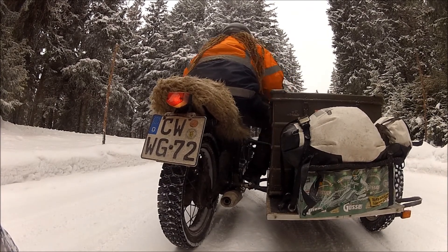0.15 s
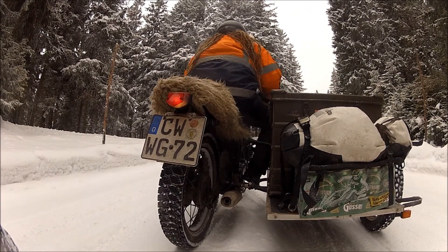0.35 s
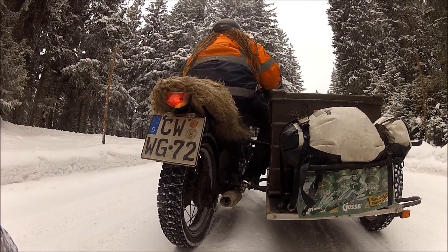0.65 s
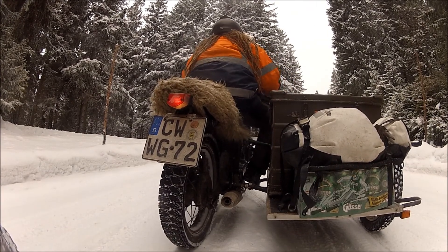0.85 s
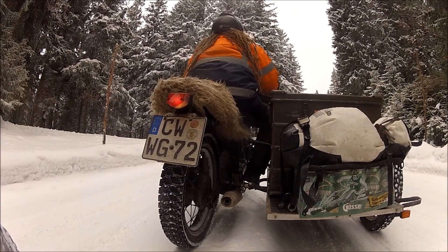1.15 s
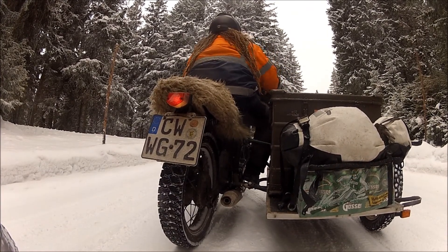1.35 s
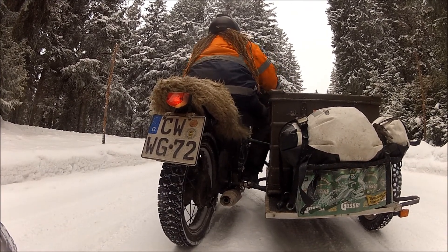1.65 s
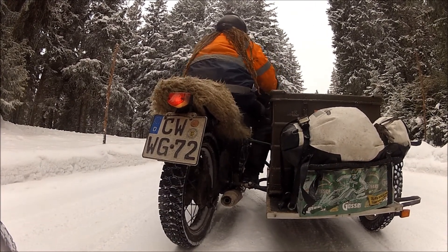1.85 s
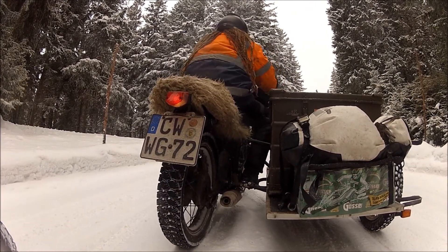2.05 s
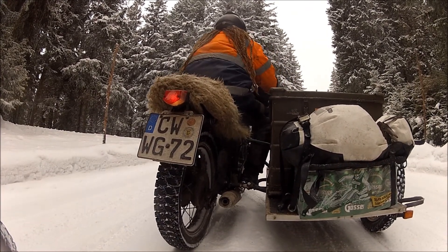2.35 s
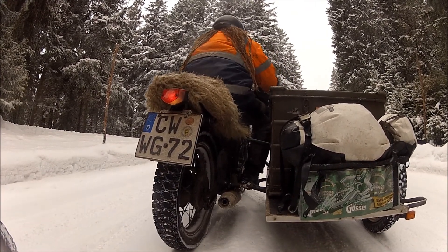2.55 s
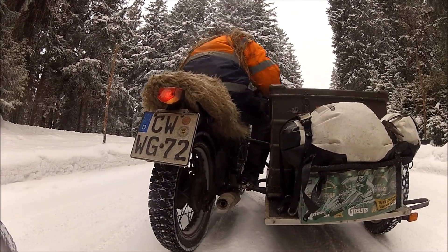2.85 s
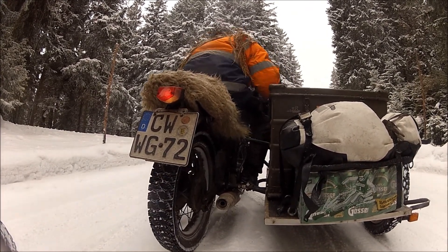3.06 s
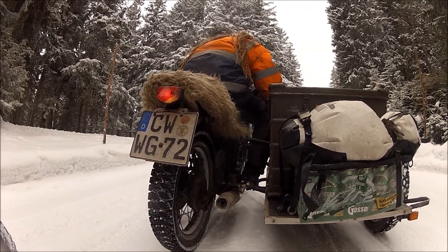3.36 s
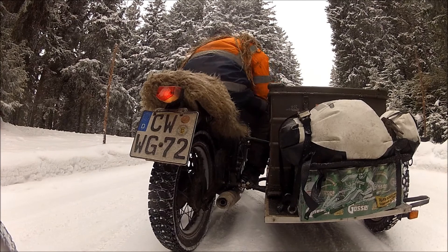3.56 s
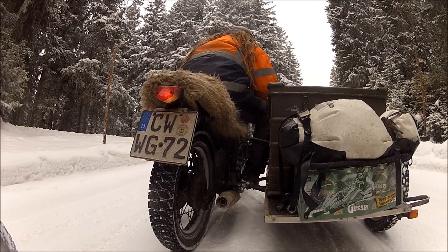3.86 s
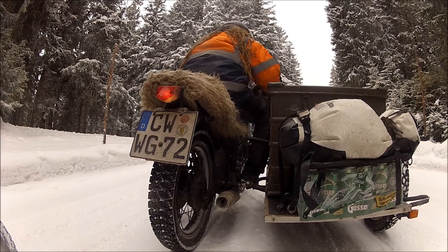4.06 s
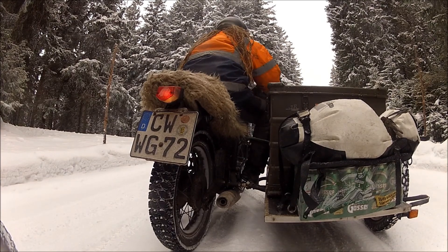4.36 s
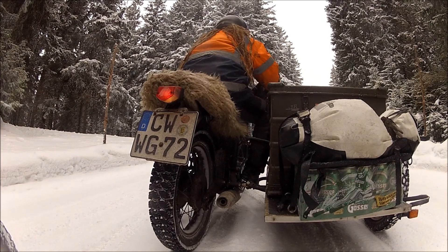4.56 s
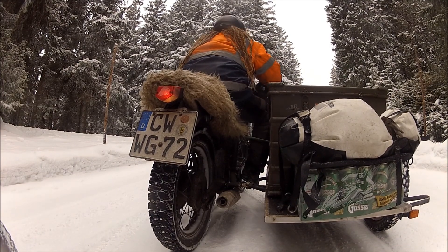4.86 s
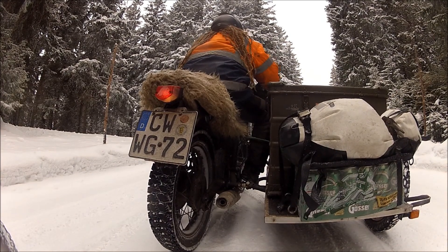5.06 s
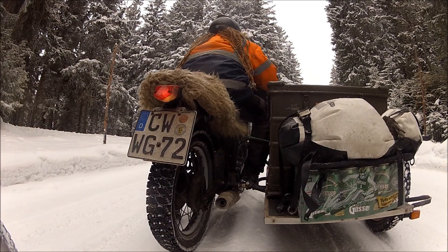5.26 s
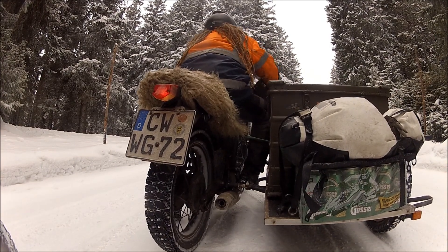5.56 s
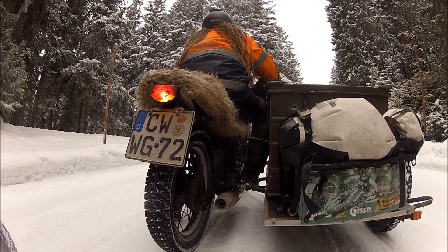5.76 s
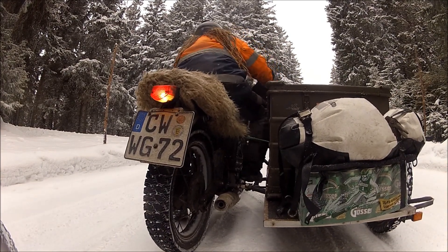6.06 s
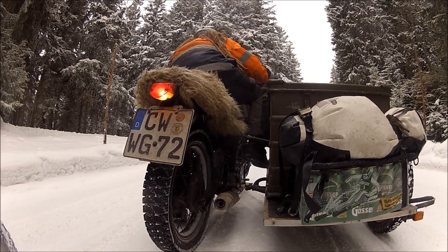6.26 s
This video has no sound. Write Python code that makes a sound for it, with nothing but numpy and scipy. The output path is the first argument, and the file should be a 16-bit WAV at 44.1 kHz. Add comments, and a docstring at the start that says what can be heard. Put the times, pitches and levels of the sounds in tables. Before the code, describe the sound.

A motorcycle engine clatters harshly and dies within half a second, ending in a heavy gear clunk. A second clunk follows about a second later, with metal knocks, low thumps and dull spring creaks. After four seconds it quiets to a thin rising squeal and a few small movements. A second engine idles faintly far off. Dry outdoor sound, microphone mounted on the machine, coarse and glassy in the treble.

```python
"""A sidecar motorcycle's engine clatters, filtered noise grains dying within about half a second on a snowy road.
The gear lever clunks twice and fittings knock, as decaying modes with noise; jolts boom the camera arm as sines.
Springs rumble as resonant noise and groan as wavering sines; a dry pivot chirps in noise and squeals in partials.
A second engine idles faintly some way off, in puffs that ring its exhaust, over a hiss of open air.
No echo is added; a coarse sample-and-hold recorder mirrors the sound into the treble."""
import sys
import numpy as np
from scipy import signal
from scipy.fft import rfft, irfft
from scipy.io import wavfile
from scipy.ndimage import uniform_filter1d

SR = 44100
rng = np.random.default_rng(int(sys.argv[2]) if len(sys.argv) > 2 else 0)


def store_wav(level_fs):
    """Save 16-bit WAV to argv[1]."""
    pcm = np.round(np.clip(np.atleast_2d(level_fs), -1, 1) * 32767)
    wavfile.write(sys.argv[1], SR, pcm.T.astype(np.int16))


N = 281975  # length in samples
T = np.arange(N) / SR  # time [s]
RING_T = T[:int(.6 * SR)]  # time within one blow [s]


def undb(db):
    """Logarithmic level: decibels to amplitude gain."""
    return 10 ** (np.asarray(db) / 20)


def unit(x):
    """Normalisation to an rms of 1."""
    return x / np.sqrt(np.mean(x ** 2) + 1e-20)


def band(x, lo_hz, hi_hz, order=2):
    """Butterworth band-pass filtering."""
    edges = [lo_hz, min(hi_hz, SR / 2 - 1)]
    return signal.sosfilt(signal.butter(order, edges, "band", fs=SR, output="sos"), x)


def resonate(x, peaks):
    """Parallel resonance, each peak applied twice in series so that the valleys stay dark."""
    out = 0
    for hz, width_hz, db in peaks:
        b, a = signal.iirpeak(hz, hz / (2 * width_hz), fs=SR)
        once = signal.lfilter(b, a, x)
        out = out + undb(db) * signal.lfilter(b, a, once)
    return out


def walk(rate):
    """Band-limited random wander of rms 1, from `rate` random knots per second."""
    knots = rng.standard_normal(int(N / SR * rate) + 2)
    joined = np.interp(T * rate, np.arange(len(knots)), knots)
    return unit(uniform_filter1d(joined, size=int(SR / rate / 2) + 1))


def grains(rate, spread_db):
    """Poisson-like impulse noise: `rate` random contacts per second, of uneven size."""
    contacts = rng.random(N) < rate / SR
    size = rng.standard_normal(N)
    extra_db = spread_db * np.minimum(rng.exponential(size=N), 4)
    return unit(contacts * size * undb(extra_db))


def fade(t60):
    """Exponential decay by 60 dB in t60 seconds."""
    return np.exp(-np.log(1000) * RING_T / t60)


def ring(modes, stretch, scatter_db, detune, disorder=1):
    """Modal decay: each blow varies the modes' levels, pitches and phases; disorder 0 gives them equal phase."""
    out = 0
    for hz, db, t60 in modes:
        level_chance, pitch_chance, phase_chance = rng.standard_normal(3)
        cycles = hz * (1 + detune * pitch_chance) * RING_T + disorder * phase_chance
        out = out + undb(db + scatter_db * level_chance) * fade(t60 * stretch) * np.sin(2 * np.pi * cycles)
    return out


def strength(x, db):
    """Onset level: scale a blow so that its first 12 ms have this rms."""
    return x * undb(db) / np.sqrt(np.mean(x[:int(.012 * SR)] ** 2))


def add(out, s, x):
    """Superposition: mix a short sound in at time s."""
    i = max(int(s * SR), 0)
    out[i:i + len(x)] += x[:N - i]


def swell(start, length, rise, t60):
    """Envelope of a push: it rises, holds to the end of its length and decays exponentially."""
    age = T - start
    attack = np.sin(np.pi / 2 * np.clip(age / rise, 0, 1)) ** 2
    return attack * np.exp(-np.log(1000) * np.clip((age - length) / t60, 0, 2))


# the running engine's resonances: (frequency [Hz], nominal width [Hz], relative level [dB])
CASING = [(376, 34, -19.5), (518, 230, -10), (725, 140, -4), (940, 44.3, 4.5), (1275, 270, -5.5),
          (1418, 13, -7.5), (1642, 79, 0), (1962, 53, 6), (2114, 16, -6.5), (2486, 58, -5),
          (3080, 35, -14.5), (3450, 99, -13), (3737, 53, -6.5), (3935, 35, -22), (5014, 233, -23.5)]
# the sprung body's dull resonances, also worked by the rider:
# (frequency [Hz], nominal width [Hz], relative level [dB])
SPRINGS = [(85.4, 27, 7.5), (115.6, 21, 1), (242, 25.5, 3.5), (267, 31, -15.5), (369.4, 51, -8.5),
           (560, 450, -18)]
# speed falls evenly to rest; the levels of clatter and shudder each follow a power of it
STOP_S, SHAKE_HZ = 0.53, 53.75
CLATTER_DB, CLATTER_POWER = -22, 2.55
SHUDDER_DB, SHUDDER_POWER = -24, 1.52


def engine():
    """Impact excitation of resonances: loose parts chatter into the casing, hardest once on every shake."""
    speed = np.maximum(1 - T / STOP_S, 0)
    shake = undb(2 * np.sin(2 * np.pi * SHAKE_HZ * T) + 2.8 * walk(90))
    chatter = unit(resonate(grains(rate=3000, spread_db=0.2) * shake, CASING))
    shudder = unit(resonate(rng.standard_normal(N), SPRINGS))
    clatter = chatter * undb(CLATTER_DB) * speed ** CLATTER_POWER
    return clatter + shudder * undb(SHUDDER_DB) * speed ** SHUDDER_POWER


# what the gearbox rings with: (frequency [Hz], relative level [dB], t60 before stretching [s])
GEARBOX = [(156.4, -23.5, .09), (234.3, -22, .41), (421, -27, .223), (464, -31.5, 0.055), (546, -11, .12),
           (646, -33.5, 1.7), (739, -1, .05), (714, 4.5, 0.067), (826, 1, 0.019), (890, -1.5, .062),
           (904, -7, 0.11), (1186, -11, .071), (1430, -12, 0.076), (1580, -10, 0.051), (1830, -5, .044)]
# heavy gear lever clunks: (time [s], onset level [dB], ring time factor, spectral tilt [dB per octave])
CLUNKS = [(.573, -14, .8, -5), (1.4758, -19.5, 1, -6)]
CRACK_DB, BUZZ_DB, BUZZ_T60_S = -3.5, -18.5, 0.38


def clunks():
    """Modal ringing from a blunt impact: gear dogs slam home over milliseconds and loose parts buzz on."""
    out = np.zeros(N)
    for s, db, stretch, tilt_db in CLUNKS:
        crack = unit(band(rng.standard_normal(len(RING_T)), 140, 2200, order=3)) * fade(.055)
        buzz = unit(band(rng.standard_normal(len(RING_T)), 260, 1100)) * fade(BUZZ_T60_S)
        loose = undb(CRACK_DB) * crack + undb(BUZZ_DB) * buzz
        modes = ring(GEARBOX, stretch, scatter_db=4.0, detune=0.0016, disorder=0.11)
        slam = 1 + .5 * np.exp(-((RING_T - .007) / .004) ** 2)
        blow = (modes + loose) * np.minimum(RING_T / 0.0047, 1) * slam
        # the tilt pivots at 700 Hz and stays level below 200 Hz
        octaves = np.log2(np.maximum(np.fft.rfftfreq(len(blow), 1 / SR), 200) / 700)
        tilted = irfft(rfft(blow) * undb(tilt_db * octaves), len(blow))
        dying = np.cos(np.pi / 2 * RING_T / RING_T[-1]) ** 2
        add(out, s, strength(tilted * dying, db))
    return out


# what the frame rings with: (frequency [Hz], relative level [dB], t60 before stretching [s])
FRAME = [(238, -4, .25), (302, -2, .16), (398, -5, .14), (460, -5, .11), (540, -6, .12), (695, -6, .07),
         (955, 0, .12), (1165, -3, .085), (1300, -4, .08), (1470, -9, .08), (1625, -5, .07),
         (1925, -1, .07), (1995, 0, .07), (2225, -6, .06), (2500, -7, .06), (2595, -7, .07),
         (3030, -6, .06), (3470, -9, .07), (3810, -11, .07)]
# knocks of levers and fittings; weight and hardness set the low body and bright edge against the clink:
# (time [s], clink onset level [dB], weight [dB], hardness [dB], ring time factor)
KNOCKS = [(0.047, -24, -19, -7, 0.42), (0.061, -25, -1, -26, 0.5), (.235, -30, -21, -31, 0.42),
          (.3465, -40.5, -7, -25, 0.23), (.418, -45.5, -6, -23, 1.9), (0.5334, -25.5, -12.5, -11.5, 0.26),
          (0.54, -28.5, -18.5, -26, 0.72), (0.759, -61.5, 17.5, -26, 1.3), (0.824, -53, 7.5, -22, 0.25),
          (1.169, -54.5, -0.5, -6.5, 0.77), (1.267, -48.5, -7, -28, 0.55), (1.6, -36, -16, -17, 1.54),
          (1.611, -29, -10.5, -10.5, 0.61), (1.657, -42, -1.5, -12, .49), (2.065, -50.5, -7, -27, 1.1),
          (2.105, -46, -5, -11, 0.63), (2.133, -53, -18, -2.5, 0.19), (2.192, -52.5, -18, -4.5, 0.62),
          (2.777, -39, -8.5, -13.5, 0.65), (2.8249, -43, -12, -10.5, 0.81), (3.048, -54.5, -11, -13, 1.6),
          (3.4632, -36, -9.5, -11, 0.78), (3.5104, -45.5, 4, -22, 1.2), (3.602, -48.5, 5, -19, 0.53),
          (3.6237, -27, -10.5, -2, 0.72), (3.893, -29, -14.5, -10, 0.93), (3.928, -42.5, -4.5, -12, 0.99),
          (5.989, -56.5, -5, -5.5, 0.39)]
# the clank between clink and body takes a share of a knock's weight
CLANK_DB, CLANK_SHARE = 3, 0.5


def knocks():
    """Modal ringing from metal impacts: weight sets the low bands and hardness the bright edge."""
    out = np.zeros(N)
    for s, db, weight_db, hardness_db, stretch in KNOCKS:
        rattle_fade = fade(.05 * stretch) + undb(-17) * fade(.15 * stretch)
        rattle = rng.standard_normal(len(RING_T)) * rattle_fade
        modes = ring(FRAME, stretch, scatter_db=2.5, detune=.005)
        # the parts graze each other for a few milliseconds before they seat
        blow = (modes + undb(6) * rattle) * np.minimum(RING_T / .005, 1) ** 1.5
        body = strength(band(blow, 190, 1000, order=3), weight_db)
        clank = strength(band(blow, 813, 1385, order=3), CLANK_DB + CLANK_SHARE * weight_db)
        clink = strength(band(blow, 1190, 2300, order=3), 0)
        edge = strength(band(blow, 2190, 3606, order=3), hardness_db)
        add(out, s, undb(db) * (body + clank + clink + edge))
    return out


# jolts that swing the camera arm:
# (time [s], push length [s], pitch [Hz], boom level [dB], deep wobble level [dB], t60 [s])
JOLTS = [(-.03, 0.28, 52.56, -15.5, -56, 0.81), (0.576, 0.14, 56, -24.5, -33.5, 0.41),
         (0.79, 0.023, 55, -26.5, -38.5, 1.03), (1.203, 0.38, 50.9, -38.5, -54, 0.73),
         (1.507, 0.12, 51.4, -20.5, -45, 0.13), (1.67, 0.047, 51.3, -19, -29, 0.25),
         (1.835, 0.047, 49.5, -29, -48, 0.87), (2.113, 0.037, 53.3, -20.5, -25.5, 0.85),
         (2.777, 0.066, 55, -42.5, -54, 1.04), (3.045, 0.15, 51.5, -41.5, -29, 0.76),
         (3.293, 0.27, 54.75, -33.5, -69, .4), (3.629, .11, 52.5, -23, -45, 0.62),
         (4.645, 0.095, 50.7, -45, -59, 0.57), (5.168, 0.093, 53.9, -40.5, -58, 0.41),
         (6.019, 0.15, 54.4, -38, -51, 0.2), (6.179, 0.067, 52.5, -36.5, -56, 0.63)]
JOLT_RISE_S, WOBBLE_HZ = 0.028, 38.2


def arm():
    """Damped bending vibration: each jolt swings the arm on its lowest mode, with a deeper wobble beneath."""
    out = np.zeros(N)
    for s, length, hz, boom_db, wobble_db, t60 in JOLTS:
        turn = 2 * np.pi * (T - s)
        swing = undb(boom_db) * np.sin(hz * turn) + undb(wobble_db) * np.sin(WOBBLE_HZ * turn)
        out += np.sqrt(2) * swing * swell(s, length, JOLT_RISE_S, t60)
    return out


# the rider shifting on saddle and springs:
# (time [s], length [s], dull rumble level [dB], scraping level [dB])
SHIFTS = [(.6, .11, -40, -52.5), (1.171, 0.18, -45.5, -56.5), (1.493, 0.26, -44.5, -59.5),
          (1.785, 0.072, -58, -54.5), (1.866, 0.034, -44, -55), (2.05, 0.034, -36, -53.5),
          (2.399, 0.028, -52, -59), (2.847, 0.042, -61, -66.5), (3.336, .1, -45.5, -69),
          (3.465, 0.05, -43, -57.5), (3.589, 0.038, -36, -63), (3.913, 0.036, -50.5, -81),
          (5.991, 0.021, -52.5, -74), (6.136, 0.044, -50, -79)]
SHIFT_RISE_S, SHIFT_T60_S = 0.039, 0.61


def shifting():
    """Friction noise through resonances: the rider's weight makes a dull rumble and a dry scrape."""
    rumble = unit(resonate(rng.standard_normal(N), SPRINGS))
    scuffs = grains(rate=1500, spread_db=2) * undb(4.5 * walk(45))
    scrape = unit(band(resonate(scuffs, CASING), 840, 3710))
    moves = np.array([swell(s, length, SHIFT_RISE_S, SHIFT_T60_S) for s, length, _, _ in SHIFTS])
    _, _, rumble_db, scrape_db = np.transpose(SHIFTS)
    # overlapping moves add in power
    rumble_gain = np.sqrt(undb(rumble_db) ** 2 @ moves ** 2)
    scrape_gain = np.sqrt(undb(scrape_db) ** 2 @ moves ** 2)
    return rumble * rumble_gain + scrape * scrape_gain


# the loaded springs groan briefly on one low note: (time [s], length [s], mean pitch [Hz], level [dB])
GROANS = [(1.203, .14, 130.2, -46), (1.28, 0.21, 87, -41), (1.559, 0.052, 272, -40),
          (1.67, 0.022, 275.6, -41), (1.792, 0.03, 92.1, -34.5), (2.05, 0.022, 417, -42),
          (2.097, 0.024, 400, -41), (2.098, .03, 100, -33.5), (6.01, 0.022, 109.8, -48),
          (6.148, 0.024, 270, -50.5)]
GROAN_RISE_S, GROAN_T60_S, GROAN_WAVER = 0.024, 0.12, .05  # waver: rms share of the pitch


def groans():
    """Frequency-modulated vibration: a spring judders under load on a low, wavering tone."""
    out = np.zeros(N)
    for s, length, hz, db in GROANS:
        phase = 2 * np.pi * np.cumsum(hz * (1 + GROAN_WAVER * walk(30))) / SR
        tone = np.sqrt(2) * np.sin(phase)
        out += tone * undb(db) * swell(s, length, GROAN_RISE_S, GROAN_T60_S)
    return out


FLUTTER_DB = 4.5  # rms level flutter at a roughness of 1


def pivot(hz, rough):
    """Stick-slip harmonics: roughness jitters pitch and level; partials stand out near 1 and 1.9-2.5 kHz."""
    hz = hz * (1 + .055 * rough * walk(500) + .0007 * walk(40))
    phase = 2 * np.pi * np.cumsum(hz) / SR
    partials = np.arange(1, 6)[:, None]
    steel_hz = [757, 1000, 1037, 1710, 1900, 2510, 2710, 4000, 5000]
    steel_db = [-27, -2, -22, -8, 1.5, -0.5, -13.5, -34, -35]
    gains = undb(np.interp(partials * hz, steel_hz, steel_db))
    summed = np.sum(gains * np.sin(partials * phase), axis=0)
    tone = summed / np.sqrt(np.sum(gains ** 2, axis=0) / 2)
    return tone * undb(FLUTTER_DB * rough * walk(300))


# the long squeal of a dry pivot: (time [s], slip rate [Hz], level [dB])
SQUEAL = [(4.708, 920, -56), (4.716, 945, -56), (4.73, 976.4, -50), (4.752, 967, -48), (4.892, 996, -51),
          (4.938, 995, -52.5), (4.994, 1025, -49), (5.068, 1032, -50), (5.085, 1090, -68)]
SQUEAL_ROUGH = 0.09
# short rasps of the same pivot, each a glide:
# (time [s], length [s], first slip rate [Hz], last slip rate [Hz], level [dB], roughness)
RASPS = [(4.635, 0.025, 727, 750, -53.5, 1.11), (4.661, 0.033, 815, 858, -52.5, 0.37),
         (5.649, 0.059, 794, 654, -53, 0.78)]
RASP_RISE_S, RASP_T60_S = 0.017, 0.071


def squeaks():
    """Stick-slip friction: the pivot rasps, settles into a clean rising squeal, and later rasps once more."""
    s, hz, db = np.transpose(SQUEAL)
    turning = uniform_filter1d(1. * ((T >= s[0]) & (T <= s[-1])), size=300)
    out = pivot(np.interp(T, s, hz), SQUEAL_ROUGH) * undb(np.interp(T, s, db)) * turning
    for start, length, first_hz, last_hz, db, rough in RASPS:
        glide = np.interp(T, [start, start + length], [first_hz, last_hz])
        out += pivot(glide, rough) * undb(db) * swell(start, length, RASP_RISE_S, RASP_T60_S)
    return out


# single slips of the dry pivot: (time [s], centre pitch [Hz], onset level [dB], t60 [s])
SLIPS = [(0.646, 1956, -32.5, 0.067), (1.104, 1950, -52.5, 0.081), (2.367, 2046, -47.5, 0.067),
         (2.9885, 2170, -51.5, 0.072), (3.304, 1990, -58.5, 0.08), (3.6705, 2330, -50, 0.033),
         (3.688, 2290, -54.5, 0.05), (3.7216, 2180, -50.5, 0.041), (4.512, 2280, -50, 0.06),
         (4.6028, 2210, -53.5, 0.038), (4.6282, 2270, -49, 0.092), (5.8565, 2200, -59.5, 0.048)]


def slips():
    """Single frictional release: the pivot lets go once in a very short chirp of narrow-band noise."""
    out = np.zeros(N)
    for s, hz, db, t60 in SLIPS:
        grit = band(rng.standard_normal(len(RING_T)), hz * .82, hz * 1.19, order=3)
        add(out, s, strength(grit * fade(t60) * np.minimum(RING_T / 0.0011, 1), db))
    return out


# the far exhaust's resonances: (frequency [Hz], relative level [dB], t60 before stretching [s])
EXHAUST = [(56.7, 3, 0.48), (101.3, 3, 0.18), (164, 1, 0.187), (222.3, -0.5, .18), (260.4, -2, 0.098),
           (403.6, -22, .12)]
# the two puffs of each idling cycle: (share of the cycle, mean gain [dB])
PUFFS = [(0, -51), (0.528, -56.5)]
IDLE_HZ, IDLE_START_S, SMEAR_DB = 9.47, .004, -59


def far_idle():
    """Periodic pulse excitation: a strong and a weak puff ring the exhaust each cycle, smeared by distance."""
    out = undb(SMEAR_DB) * unit(band(rng.standard_normal(N), 87, 268))
    for start in np.arange(IDLE_START_S, N / SR, 1 / IDLE_HZ):
        for share, db in PUFFS:
            late, size_db = rng.standard_normal(2)
            modes = ring(EXHAUST, 0.83, scatter_db=4.0, detune=0.025, disorder=0.14)
            puff = modes * np.minimum(RING_T / 0.0084, 1)
            s = min(start + share / IDLE_HZ + .002 * late, T[-1])
            add(out, s, puff * undb(db + size_db))
    return out


# spectrum of the open air's hiss: (frequency [Hz], relative level per Hz [dB])
AIR = [(40, -10), (300, -7), (400, -19.5), (770, -16.5), (960, -14), (1250, -20.5), (2500, -19.5),
       (4450, -26), (5400, -29), (7000, -38.5)]
AIR_DB = -63.5  # level before a slight random wander


def air():
    """Spectrally shaped noise: a faint, nearly even hiss of open air and microphone."""
    hz, db = np.transpose(AIR)
    colour = undb(np.interp(np.log(np.fft.rfftfreq(N, 1 / SR) + 1), np.log(hz), db))
    hiss = unit(irfft(rfft(rng.standard_normal(N)) * colour, N))
    return hiss * undb(AIR_DB + .4 * walk(15))


def scene():
    """Superposition: every source adds linearly at one microphone."""
    machine = engine() + clunks() + knocks() + arm()
    friction = shifting() + groans() + squeaks() + slips()
    return (machine + friction + far_idle() + air())[None]


HOLD_HZ, BAND_HZ, TOP_HZ = 12000, 5600, 15500  # hold rate, input and output low-pass edges


def record(dry):
    """Sample-and-hold imaging: a low sampling rate mirrors the sound into a glassy treble."""
    narrow = signal.sosfilt(signal.ellip(8, .2, 70, BAND_HZ, fs=SR, output="sos"), dry)
    # the first pair of images about the hold rate
    sampled = narrow * (1 + 2 * np.cos(2 * np.pi * HOLD_HZ * T))
    # holding each value weights the spectrum by a sinc
    held = irfft(rfft(sampled) * np.sinc(np.fft.rfftfreq(N, 1 / SR) / HOLD_HZ), N)
    return signal.sosfilt(signal.ellip(8, .2, 70, TOP_HZ, fs=SR, output="sos"), held)


dry = scene()
out = record(dry)
store_wav(out)
```